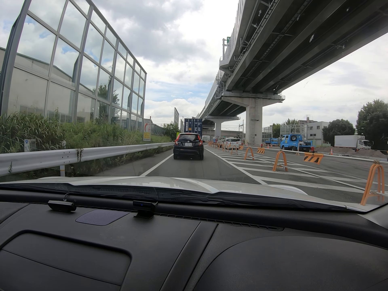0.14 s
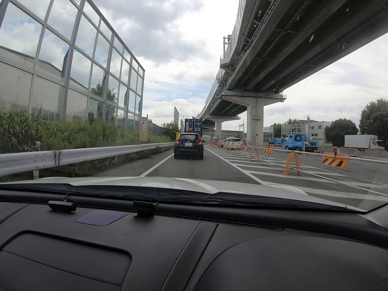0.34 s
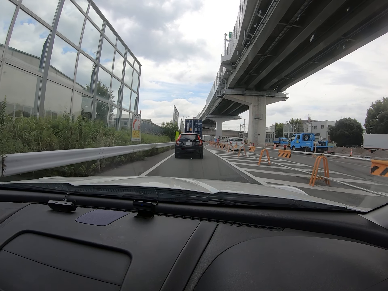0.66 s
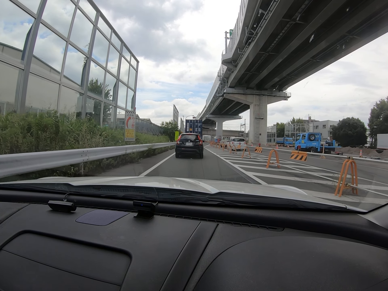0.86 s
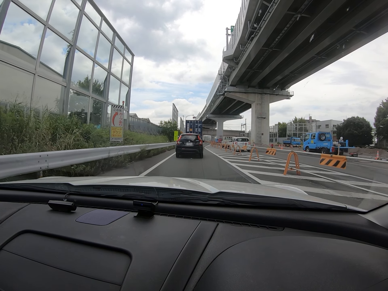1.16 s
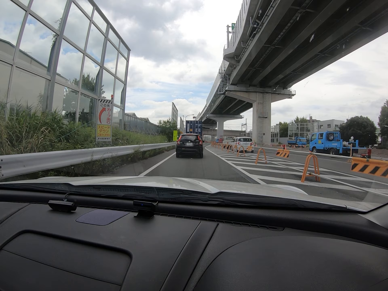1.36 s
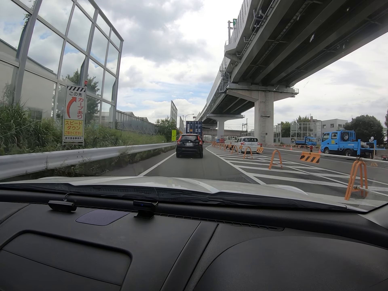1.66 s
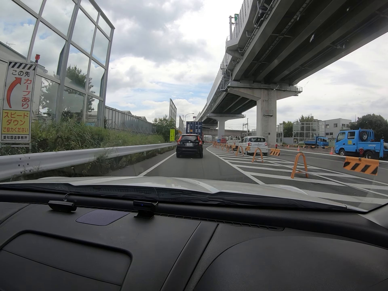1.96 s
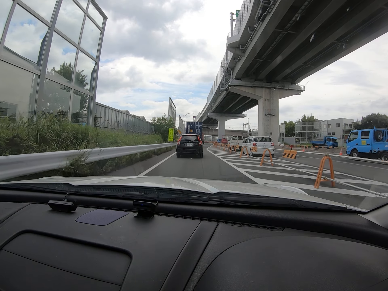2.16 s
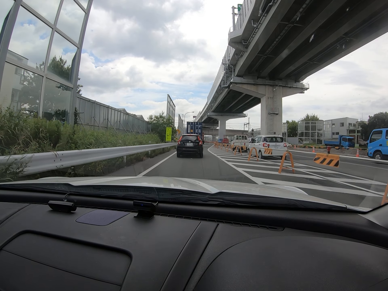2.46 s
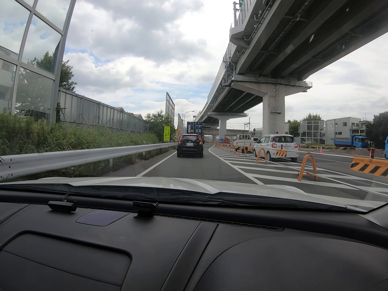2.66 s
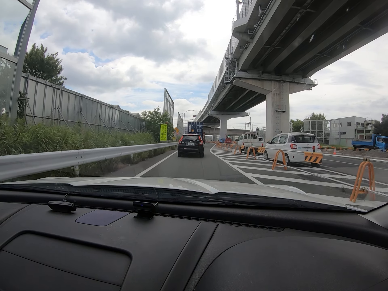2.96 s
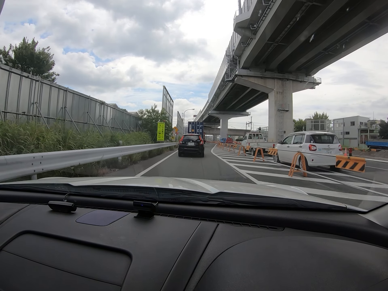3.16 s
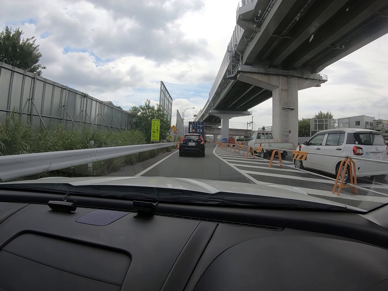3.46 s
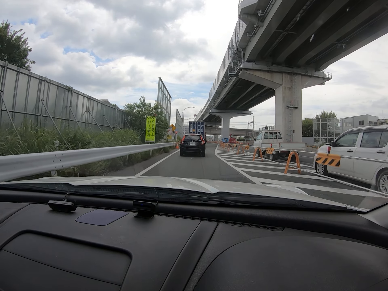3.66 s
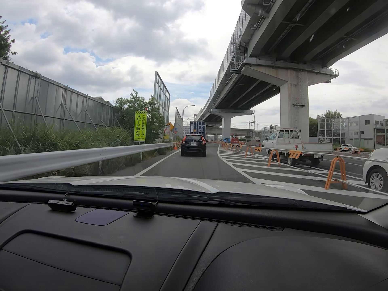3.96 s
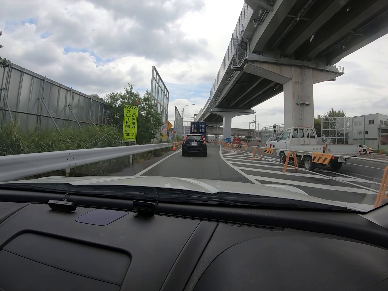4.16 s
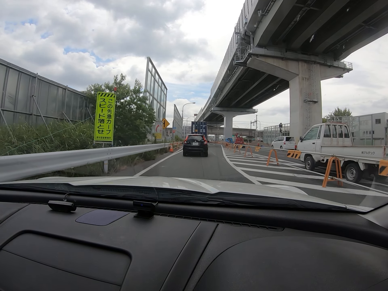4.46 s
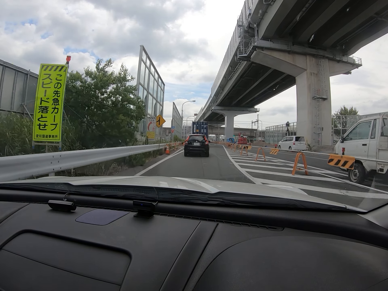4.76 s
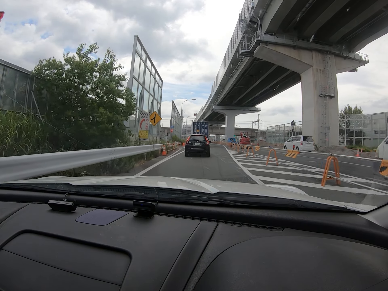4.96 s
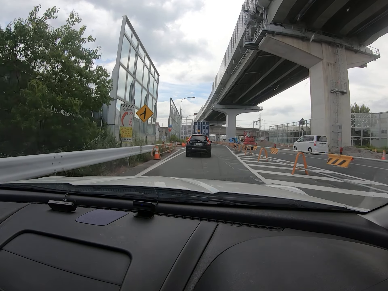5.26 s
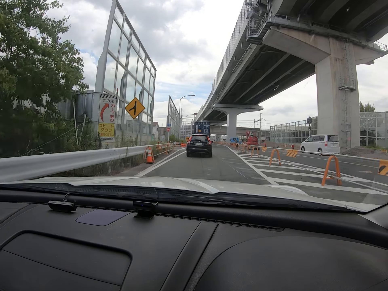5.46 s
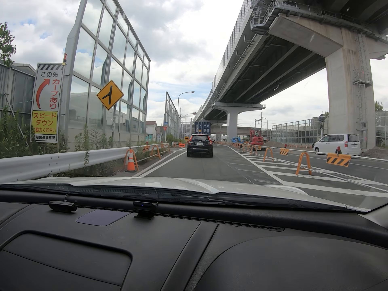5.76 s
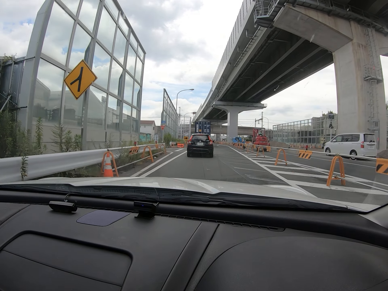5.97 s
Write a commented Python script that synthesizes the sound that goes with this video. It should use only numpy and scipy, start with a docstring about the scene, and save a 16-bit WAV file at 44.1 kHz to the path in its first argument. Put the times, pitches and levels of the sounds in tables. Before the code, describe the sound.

Inside a car accelerating on a city road, heard close to the dashboard for about six seconds. From the start a deep, smooth exhaust drone rises steadily in one gear, its pitch roughly doubling by the end, while a thin gear whine climbs above it, swelling and dipping. Low body rumble, boomy cabin resonance, tyre roar, soft air hiss and a faint vent hum fill the space, growing with speed. Tiny plastic ticks sound around 0.4 s. From about 1.5 to 2.3 s the drone becomes harder and buzzier, then smooths again. More trim clicks follow at 1.9 and 2.6 s, with a cluster from 3.0 to 3.6 s as the road gets rougher. Near 5 s the whine's high overtone is clearest; a sharper tick comes at 5.3 s. The climb then levels off, the throttle eases and the drone fades beneath a boomy swell of road noise around 5.6 s.

```python
"""Inside a rotary-engined car gathering speed in one gear on a city road, heard from behind the dashboard.
From the start the exhaust drones at the firing rate and a gear whines above it, both rising;
random noise shaped by resonances and spectra gives road rumble, tyre roar, hiss and a vent hum.
From 0.4 s plastic trim ticks now and then, as bursts of decaying noise; from 1.5 to 2.3 s the drone hardens.
Near 5 s the whine's overtone is strongest, then the throttle is eased and the drone fades."""
import sys
import numpy as np
from scipy import signal
from scipy.fft import rfft, irfft
from scipy.io import wavfile
from scipy.ndimage import uniform_filter1d, minimum_filter1d

SR = 44100
rng = np.random.default_rng(int(sys.argv[2]) if len(sys.argv) > 2 else 0)


def transcribe(u):
    """Save the signal u as a 16-bit wav file named by the first command-line argument.

    u: samples, shape (n,) or (channels, n), limited to [-1, 1]; the rate is SR.
    q: integer samples, one column per channel.
    """
    v = np.clip(np.atleast_2d(u).T, -1, 1)
    q = np.round(v * 32767).astype(np.int16)
    wavfile.write(sys.argv[1], SR, q)


N = 269878
TIME = np.arange(N) / SR
BINS = np.maximum(np.arange(N // 2 + 1) * SR / N, 1)   # Hz


def from_db(db):
    """Decibels to gain."""
    return 10 ** (np.asarray(db) / 20)


def rms_one(x):
    """Scale to unit rms."""
    return x / np.sqrt(np.mean(x ** 2) + 1e-20)


def in_time(rows):
    """Each column of a curve table at every sample."""
    s, *columns = np.transpose(rows)
    return [np.interp(TIME, s, c) for c in columns]


def at_hz(points, hz):
    """Read a spectrum on a log-frequency axis."""
    known_hz, values = np.transpose(points)
    return np.interp(np.log(hz), np.log(known_hz), values)


def drift(rate_hz):
    """Random wander of unit rms; its spectrum is halved at rate_hz."""
    spectrum = rfft(rng.standard_normal(N)) / (1 + (BINS / rate_hz) ** 2)
    return rms_one(irfft(spectrum, N))


def stereo_noise(gain, likeness):
    """Noise of the given gain per root Hz; likeness is the left-right correlation."""
    mid, side = rfft(rng.standard_normal((2, N))) * gain * np.sqrt(SR) / 2
    alike = np.clip(likeness, -1, 1)
    mid = mid * np.sqrt(1 + alike)
    side = side * np.sqrt(1 - alike)
    return irfft(np.array([mid + side, mid - side]), N)


def resonances(modes):
    """Random forcing rings each mode; the skirts fall steeply."""
    out = 0
    for hz, width_hz, db, likeness in modes:
        detune = (BINS ** 2 - hz ** 2) / (BINS * width_hz)
        out = out + from_db(db) * rms_one(stereo_noise(1 / (1 + detune ** 2), likeness))
    return out


# left-right likeness of broad noise: f/Hz, correlation
NOISE_LIKENESS = [(130, .85), (400, .75), (750, .45), (1100, .05), (1500, .5), (4000, .55), (6400, .3),
                  (10000, .3)]


def broad_noise(spectrum):
    """Smooth noise that dies away beyond both ends of its spectrum."""
    low_hz, high_hz = spectrum[0][0], spectrum[-1][0]
    ends = np.minimum(np.minimum(BINS / low_hz, high_hz / BINS), 1) ** 4
    gain = from_db(at_hz(spectrum, BINS)) * ends
    return stereo_noise(gain, at_hz(NOISE_LIKENESS, BINS))


def pan(left_db):
    """Gains of the two sides for a left-right difference."""
    return from_db(np.array([[left_db], [-left_db]]) / 2)


def tone(phase, db, lead_rad=0.0):
    """A stereo sine of the given rms level; the left side leads by an angle."""
    return np.sqrt(2) * from_db(db) * np.sin([phase + lead_rad / 2, phase - lead_rad / 2])


# engine speed before surge: t/s, firing rate f/Hz
FIRING_SPEED = [(0, 40.9), (1.0, 50.8), (2.05, 61.25), (2.55, 64.95), (3.05, 68.3), (4.5, 76.3),
                (4.85, 79.0), (5.45, 82.2), (6.12, 82.8)]
SURGE_HZ, SURGE_SHARE = 2.65, .0018


def engine_speed():
    """Firing rate climbs in one gear while the driveline rocks gently against its mounts."""
    surge = 1 + SURGE_SHARE * np.cos(2 * np.pi * SURGE_HZ * TIME)
    return in_time(FIRING_SPEED)[0] * surge


# exhaust drone, fading as the throttle is eased: t/s, fundamental level/dB, second harmonic level/dB
DRONE_LEVELS = [(0.15, -15.1, -26.8), (0.35, -15.8, -28.5), (0.55, -20, -31.5), (0.88, -17, -26.5),
                (0.98, -20, -27.5), (1.1, -14.6, -30), (1.65, -16.8, -30.5), (1.8, -21, -30.5),
                (1.9, -18.5, -28), (2.12, -20, -25.3), (2.45, -18.4, -27), (2.85, -20.3, -28.7),
                (3.1, -21.3, -26.7), (3.7, -22.8, -28.3), (4.15, -21.2, -31), (4.85, -18.7, -29.3),
                (5.3, -22.3, -37.5), (5.55, -22.8, -42), (5.8, -27, -41.5), (6.1, -30, -42)]
# cabin response to higher firing harmonics: f/Hz, level/dB
CABIN_RESPONSE = [(122, -27), (148, -32), (162, -39), (172, -32.5), (188, -40), (205, -50), (225, -42),
                  (245, -44), (275, -54), (380, -55), (500, -58)]
# pulses harden briefly under load: t/s, fall per doubling of (harmonic - 2)/dB
PULSE_SOFTNESS = [(0, 4.5), (1.3, 6), (1.55, -.5), (2.3, -1), (2.55, 3), (4.8, 3), (5.3, 7)]
FLUTTER_DB = .4


def exhaust(phase, firing_hz, rough_db=0.7, count=4):
    """Even firings give a near-sine drone; upper harmonics swell on cabin modes and as the pulses harden."""
    first_db, second_db = in_time(DRONE_LEVELS)
    fall_db, = in_time(PULSE_SOFTNESS)
    out = tone(phase, first_db + FLUTTER_DB * drift(27), lead_rad=0.063)
    out += tone(2 * phase + rng.uniform(0, 2 * np.pi), second_db + FLUTTER_DB * drift(27))
    for step in range(1, count + 1):
        harmonic = 2 + step
        level_db = at_hz(CABIN_RESPONSE, harmonic * firing_hz) - fall_db * np.log2(step)
        start_rad = rng.uniform(0, 2 * np.pi)
        out += tone(harmonic * phase + start_rad, level_db + rough_db * drift(3.7))
    return out * pan(-1.2)


# cabin standing waves crossed by the whine: f/Hz, width/Hz, level/dB, left-right difference/dB
STANDING_WAVES = [(351.8, 14.9, -43.9, -1.3), (368, 9, -53, -2), (388, 11, -55.5, -4.2),
                  (411, 12, -52.5, -5.0), (433, 10, -55.5, -2), (452.5, 14, -46.3, -2.5),
                  (509.5, 11, -47, -4.3), (536.9, 6.2, -53.5, 6.6), (553, 4, -45.5, 0.5),
                  (561, 9, -48.5, 1), (583.0, 5, -51.5, 1), (626.0, 30, -53.3, -5.1),
                  (702.8, 23.1, -54.7, 1.5)]
WHINE_DIRECT_DB = -67   # straight through the floor


def standing_waves(hz):
    """Complex gain per side of a gliding tone: it swells on each mode; neighbours interfere between."""
    gain = from_db(WHINE_DIRECT_DB)
    for mode_hz, width_hz, db, left_db in STANDING_WAVES:
        gain = gain + from_db(db) * pan(left_db) / (1 + 2j * (hz - mode_hz) / width_hz)
    return gain


WHINE_PER_FIRING = 8.6


def gear_whine(phase, firing_hz, jitter_rad=0.11, waver_db=0.74, lead_rad=.9):
    """Meshing teeth sing at a fixed multiple of engine speed, with an overtone an octave up."""
    mesh = WHINE_PER_FIRING * phase + jitter_rad * drift(8.7)
    mesh_hz = WHINE_PER_FIRING * firing_hz
    sides = mesh + lead_rad * drift(0.79) * np.array([[.5], [-.5]])
    waver = from_db(waver_db * np.array([drift(8.6), drift(7.0)]))
    whine = np.sqrt(2) * np.imag(standing_waves(mesh_hz) * np.exp(1j * sides)) * waver
    return whine + panel_overtone(mesh, mesh_hz)


CRUISE_HZ = 70


def by_speed(law, firing_hz):
    """Level of a road noise: in one gear, road speed follows the firing rate."""
    cruise_db, doubling_db = law
    return cruise_db + doubling_db * np.log2(firing_hz / CRUISE_HZ)


# rougher and smoother road: mid t/s, length/s (to 1/e), body shake/dB, cabin boom/dB, tyre noise/dB
ROAD_PATCHES = [(0.1, 0.24, 1, 1, 6), (0.653, 0.83, 1, 1.5, 0), (1.0, .2, 3, -2.5, .5),
                (1.32, 0.55, -4.5, -4.5, -1.6), (2.2, 0.5, 1, -1.5, 0), (2.65, 0.25, 1, 1, -1),
                (3.401, 0.99, 5, -0.7, 1), (4.308, 0.097, -1, 4, 2.5), (5.466, 0.22, 4, -4.5, 0),
                (5.6, 0.2, -2, 8, 1), (6.0, 0.13, 4.5, 0, 1.9)]


def rough_patches():
    """Each stretch gives shake, boom and tyre noise a bell-shaped swell or lull, in dB."""
    total_db = 0
    for s, length_s, *levels_db in ROAD_PATCHES:
        bell = np.exp(-(2 * (TIME - s) / length_s) ** 2)
        total_db = total_db + np.outer(levels_db, bell)
    return total_db


# body on springs and mounts: f/Hz, width/Hz, base level/dB, left-right correlation
BODY_SHAKE = [(21, 14, -36, .93), (36, 14, -34, .97), (52, 13, -29.5, .94), (76, 22, -42, .9)]
# cabin air modes: f/Hz, width/Hz, base level/dB, left-right correlation
CABIN_BOOM = [(107.5, 20, -23.4, 0.82), (131, 24, -35.5, 0.5), (177, 32, -50.5, 0.52)]
# speed laws: level at cruise/dB, gain per doubling of speed/dB
SHAKE_SPEED_LAW = (0, 0.95)
BOOM_SPEED_LAW = (-1.4, 8)


def rumble(firing_hz, shake_db, boom_db):
    """The road shakes the body on its springs and rings the cabin air."""
    shake = from_db(shake_db + by_speed(SHAKE_SPEED_LAW, firing_hz)) * resonances(BODY_SHAKE)
    boom = from_db(boom_db + by_speed(BOOM_SPEED_LAW, firing_hz)) * resonances(CABIN_BOOM)
    return shake * pan(-1.0) + boom * pan(-4.0)


# air ring inside the tyres: f/Hz, width/Hz, base level/dB, left-right correlation
TYRE_CAVITY = [(221, 9, -39, 0.46), (228.5, 8, -37, 0.3), (246, 18, -45, .2), (274, 42, -43.3, .1)]
# body panels: f/Hz, width/Hz, base level/dB, left-right correlation
BODY_PANELS = [(345, 84, -48.5, 0.99), (465, 44, -57.5, 0.28), (865, 40, -65.5, 0.16),
               (1157, 45, -61.5, -0.6)]
# speed laws: level at cruise/dB, gain per doubling of speed/dB
CAVITY_SPEED_LAW = (-2.3, 14)
PANEL_SPEED_LAW = (-3, 3.5)


def roar(firing_hz, surface_db):
    """The road surface rings the air in the tyres and the body panels."""
    cavity = from_db(surface_db + by_speed(CAVITY_SPEED_LAW, firing_hz)) * resonances(TYRE_CAVITY)
    panels = from_db(surface_db + by_speed(PANEL_SPEED_LAW, firing_hz)) * resonances(BODY_PANELS)
    return (cavity + panels) * pan(0.92)


# broad tyre noise: f/Hz, base level/dB per Hz
TREAD_SPECTRUM = [(130, -53.5), (200, -59.5), (290, -70.5), (420, -71), (600, -76.5), (800, -80),
                  (1100, -86.5), (1500, -94), (2500, -115)]
# speed law: level at cruise/dB, gain per doubling of speed/dB
TREAD_SPEED_LAW = (-2.5, 5.4)


def tread_noise(firing_hz, surface_db, grain_db=0.7):
    """Rolling tread makes broad, slightly grainy noise."""
    level = from_db(surface_db + by_speed(TREAD_SPEED_LAW, firing_hz))
    return level * broad_noise(TREAD_SPECTRUM) * from_db(grain_db * drift(55)) * pan(-0.55)


# broad air hiss: f/Hz, base level/dB per Hz
AIR_SPECTRUM = [(500, -92), (1000, -89), (1260, -90), (1400, -89), (1530, -91.5), (1850, -91.7),
                (2100, -93.7), (2400, -94), (2700, -98.3), (3600, -103.8), (4000, -103.8), (5200, -111.3),
                (6400, -112.5), (8200, -113.7), (9200, -120.5), (10200, -122), (11500, -134), (15000, -140)]
# speed law: level at cruise/dB, gain per doubling of speed/dB
HISS_SPEED_LAW = (-0.26, 4.6)
# narrow peaks in the hiss: f/Hz, width/Hz, base level/dB, left-right correlation
SIZZLE_PEAKS = [(2235, 110, -74.5, .8), (2445, 60, -80, .7), (3195, 210, -73, .8), (3285, 105, -71.3, .85),
                (3452, 70, -77, .85), (4385, 160, -81, .8), (7020, 450, -81.3, .1), (7460, 420, -80, .55)]
# gain of those peaks: t/s, level/dB
SIZZLE_LEVEL = [(.15, -.5), (.5, -3.5), (1.1, -2.5), (1.7, -3.5), (2.05, -1.5), (2.5, -2), (3.6, -2),
                (4.2, 0.5), (5.4, 0.2), (6.1, 1.5)]


def air_hiss(phase, firing_hz, surface_db, throb=0.081, flicker_db=2.06, coarse_db=0.6):
    """Broad hiss and flickering narrow peaks throb slightly with the firings."""
    sizzle_db = in_time(SIZZLE_LEVEL)[0] + flicker_db * drift(48)
    sizzle = resonances(SIZZLE_PEAKS) * from_db(sizzle_db)
    level = from_db(surface_db + by_speed(HISS_SPEED_LAW, firing_hz))
    air = level * broad_noise(AIR_SPECTRUM) * from_db(coarse_db * drift(55))
    return (sizzle + air) * (1 + throb * np.sin(phase)) * pan(-.4)


def road(phase, firing_hz):
    """Rough patches and road speed drive rumble, roar, tread and hiss."""
    shake_db, boom_db, surface_db = rough_patches()
    body = rumble(firing_hz, shake_db, boom_db) + roar(firing_hz, surface_db)
    return body + tread_noise(firing_hz, surface_db) + air_hiss(phase, firing_hz, surface_db)


# air duct: f/Hz, width/Hz, level/dB, left-right correlation
VENT_MODE = [(552, 26, -56.8, .4)]


def vent_hum():
    """Noise in one narrow duct resonance, independent of speed."""
    return resonances(VENT_MODE)


# trim ticks: t/s, crack level/dB, ping level/dB, knock level/dB, crack lowpass f/Hz
TRIM_TICKS = [(0.420, -56, -67, -70, 15000), (0.438, -69, -62, -72, 11000), (1.923, -66, -58, -70, 10000),
              (2.600, -54.5, -66, -68, 15000), (2.986, -72, -62, -72, 10000),
              (3.1715, -59, -56, -56, 10500), (3.200, -61, -68, -64, 10000), (3.379, -51, -64, -55, 14000),
              (3.5765, -54, -60, -62, 10000), (4.108, -70, -60, -72, 10000), (4.768, -68, -62, -70, 10000),
              (5.288, -48.5, -62, -51.5, 12000), (5.296, -65, -73, -68, 9000), (5.885, -65, -70, -66, 9000)]
# hollow trim modes: f/Hz, width/Hz, relative level/dB, left-right correlation
TRIM_MODES = [(1400, 700, -1, .4), (3100, 600, 0, .4)]
# tick colour, relative: f/Hz, level/dB per Hz
CRACK_SPECTRUM = [(600, 9), (1500, 8), (2500, 6), (3400, 3), (4400, 1), (5500, -3), (7200, 0),
                  (10000, -4.5), (13000, -17), (15000, -34)]
TICK_RISE_S = .0002


def trim_ticks(chatter_db=-1.5, snap_db=1, snap_t60_s=0.0037, crack_t60_s=0.03, tail_db=-13,
               tail_t60_s=0.1, rattle_db=4, ping_hz=8400, ping_t60_s=0.013):
    """Plastic panels slip: a snap, a dry crackle with thin ping and hollow knock, then a faint rattle."""
    crackle = rms_one(broad_noise(CRACK_SPECTRUM)) * from_db(chatter_db * drift(600))   # uneven jerks
    ping = rms_one(stereo_noise(1 / (1 + ((BINS - ping_hz) / 450) ** 2), 0.46))
    knock = rms_one(resonances(TRIM_MODES))
    settling_db = tail_db + rattle_db * drift(130)
    out = np.zeros((2, N))
    for s, crack_db, ping_db, knock_db, top_hz in TRIM_TICKS:
        start = int(s * SR)
        span = slice(start, min(start + SR // 10, N))
        age = TIME[span] - TIME[start]
        snap = from_db(snap_db - 60 * age / snap_t60_s)
        rattle = from_db(settling_db[span] - 60 * age / tail_t60_s)
        decay = from_db(-60 * age / crack_t60_s) + rattle
        lowpass = signal.butter(4, top_hz, fs=SR, output="sos")
        crack = signal.sosfilt(lowpass, crackle[:, span] * from_db(crack_db) * (snap + decay))
        thin = ping[:, span] * from_db(ping_db - 60 * age / ping_t60_s)
        hollow = knock[:, span] * from_db(knock_db) * decay
        out[:, span] += (1 - np.exp(-age / TICK_RISE_S)) * (crack + thin + hollow)
    return out


# thin panels set ringing: f/Hz, width/Hz, peak level/dB, left-right correlation
OVERTONE_PANELS = [(1361, 16, -69.5, .7), (1440, 60, -69.5, .6)]
OVERTONE_HZ, OVERTONE_HALF_WIDTH_HZ, OVERTONE_DB = 1390, 90, -71.5


def panel_overtone(mesh, mesh_hz):
    """Panels pick up the whine's ragged second harmonic near the top of the climb."""
    response = 1 / (1 + ((2 * mesh_hz - OVERTONE_HZ) / OVERTONE_HALF_WIDTH_HZ) ** 2)
    ragged = tone(2 * mesh + 2 * drift(9), OVERTONE_DB + 3 * drift(17))
    return response * (ragged + resonances(OVERTONE_PANELS))


def scene():
    """One engine speed drives drone, whine and road noise; the vent hums on regardless."""
    firing_hz = engine_speed()
    phase = 2 * np.pi * np.cumsum(firing_hz) / SR
    drivetrain = exhaust(phase, firing_hz) + gear_whine(phase, firing_hz)
    return drivetrain + road(phase, firing_hz) + vent_hum() + trim_ticks()


def limiter(x, ceiling_db=-8.5):
    """The gain eases down around crests above the ceiling, both sides alike."""
    needed = np.minimum(1, from_db(ceiling_db) / (np.abs(x).max(axis=0) + 1e-9))
    held = minimum_filter1d(needed, size=SR // 16)
    return x * uniform_filter1d(held, size=SR // 16)


CUTOFF_HZ = 15600


def record(dry):
    """A limiter holds the crests, and the top of the treble is cut."""
    lowpass = signal.cheby2(12, 70, CUTOFF_HZ, fs=SR, output="sos")
    return signal.sosfilt(lowpass, limiter(dry))


dry = scene()
out = record(dry)
transcribe(out)
```